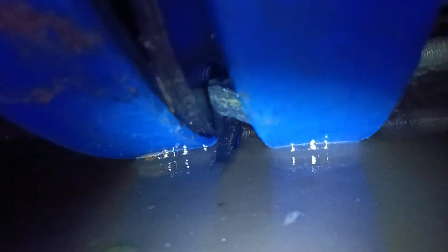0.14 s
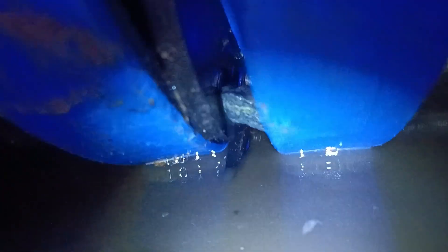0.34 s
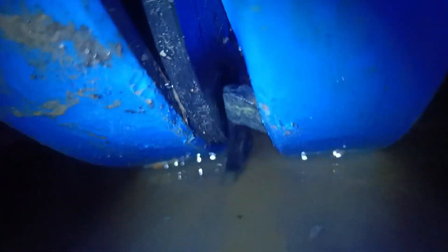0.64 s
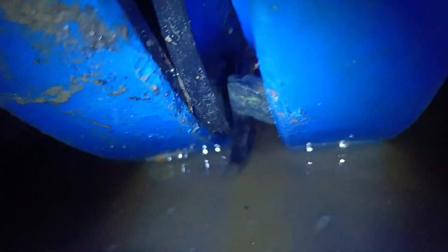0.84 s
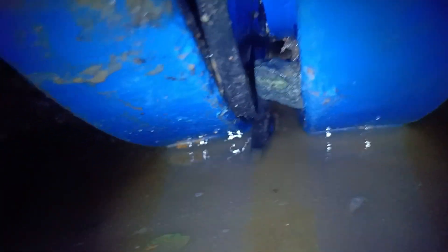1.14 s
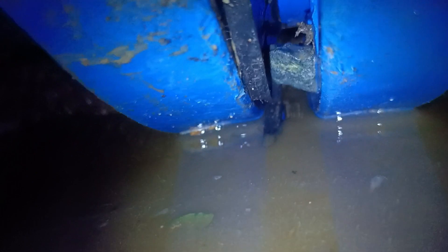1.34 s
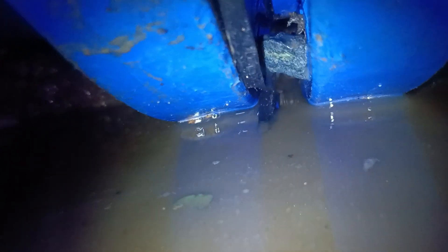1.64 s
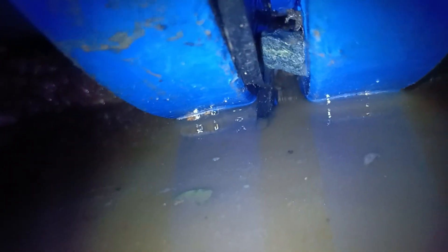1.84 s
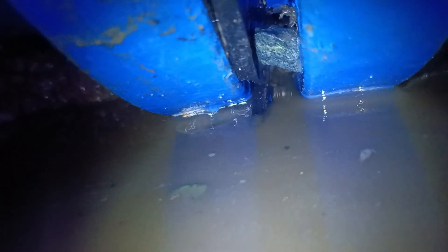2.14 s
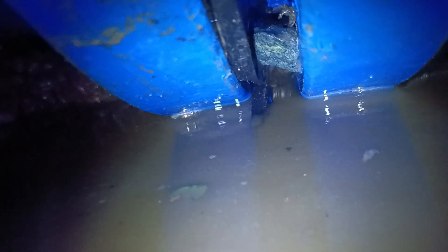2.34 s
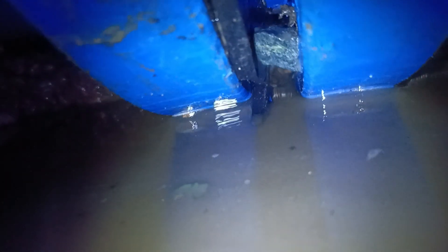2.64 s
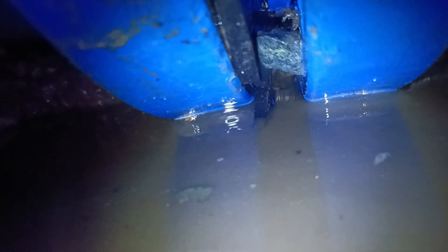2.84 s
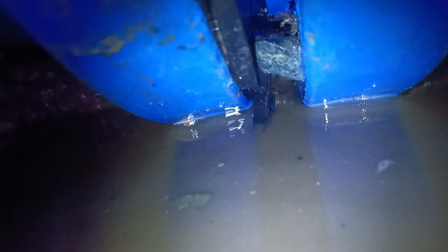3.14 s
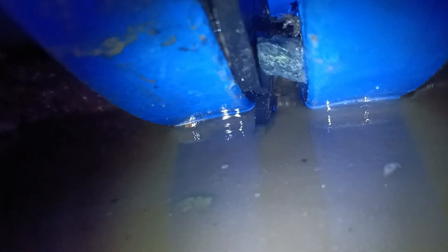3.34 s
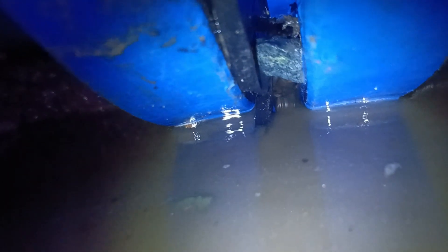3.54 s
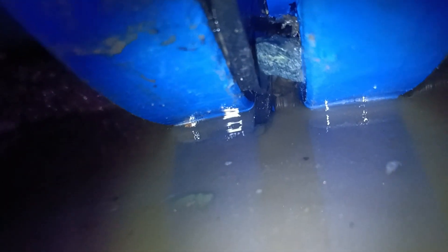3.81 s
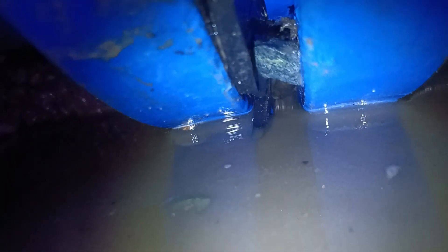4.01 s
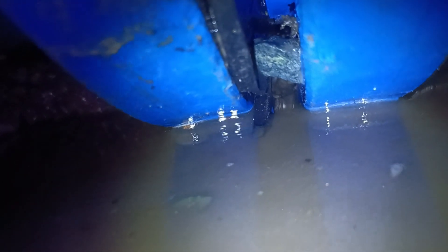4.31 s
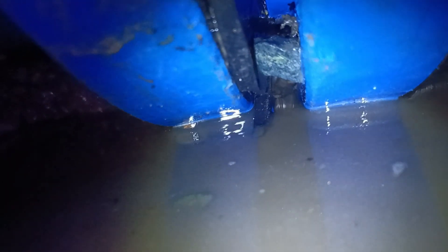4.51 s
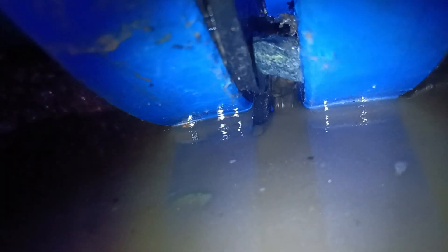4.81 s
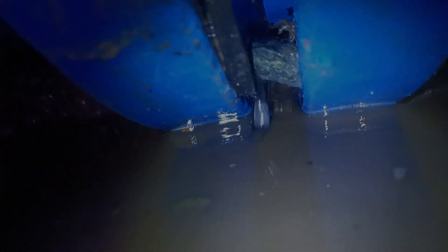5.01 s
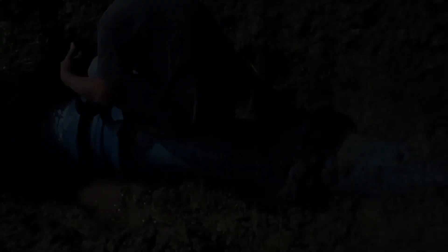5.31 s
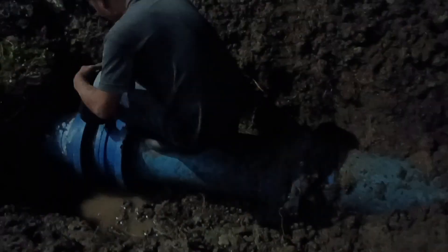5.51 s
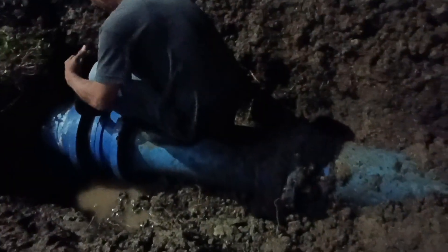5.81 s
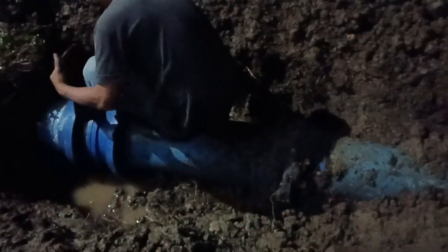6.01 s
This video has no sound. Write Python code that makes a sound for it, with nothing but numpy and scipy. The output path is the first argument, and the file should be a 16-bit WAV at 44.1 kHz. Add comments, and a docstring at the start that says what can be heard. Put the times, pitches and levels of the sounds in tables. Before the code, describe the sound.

Loud, wet sputtering fills the foreground: bubbles burst and snap in quick uneven clusters, coloured by a hollow pipe, with crisp spray on top and low glugs beneath. Brief gaps early on let the churning water show; later the bursts crowd together and gurgle more thickly. After five seconds everything stops dead. Then, much quieter and farther away, a soft dull water wash is heard outdoors with a thin, falling insect-like chirp.

```python
"""Air and water sputter from a leaking joint of a wide plastic pipe, just under a muddy puddle, very near.
Spurts of small bubbles, noise and spray are gated by a fluttering gap and filtered by the pipe's resonances.
Big bubbles pop through the same pipe; soft drips are damped sines; the flow is shaped noise with glugs.
After a cut to silence the trench is heard from farther away: a dull noise wash and one thin high chirp."""
import sys
import numpy as np
from scipy import signal
from scipy.fft import rfft, irfft, next_fast_len
from scipy.io import wavfile
from scipy.ndimage import uniform_filter1d, minimum_filter1d, map_coordinates

SR = 44100
rng = np.random.default_rng(int(sys.argv[2]) if len(sys.argv) > 2 else 0)


def output_pcm(signal):
    """Save a mono or channel-first signal as 16-bit PCM at the path in sys.argv[1].

    Samples are clipped to [-1, 1] before scaling.
    """
    pcm = np.clip(np.atleast_2d(signal).T, -1, 1) * 32767
    wavfile.write(sys.argv[1], SR, np.round(pcm).astype(np.int16))


def boost_factor(decibels):
    """Convert a level in decibels to a linear amplitude factor."""
    exponent = np.asarray(decibels, float) / 20
    return 10 ** exponent


N = 271656

# far wash spectrum: f/Hz, relative density/dB
FAR_WASH = [(30, -29.5), (60, -7), (150, -1.5), (360, -9), (1350, -13), (3000, -21), (4500, -39.5),
            (7100, -40), (7800, -35), (8500, -39), (15300, -55), (16000, -82)]
# chirp track: t/s, f/Hz, rms level/dB
CHIRP_TRACK = [(5.705, 11850, -63), (5.76, 11850, -62), (5.82, 11300, -65), (5.885, 10560, -78)]
# flow rumble spectrum, with a faint wash on top: f/Hz, relative density/dB
FLOW_RUMBLE = [(24, -56), (40, -20.5), (91, -0.5), (266, -2), (621, -21.5), (859, -20.5), (2710, -31),
               (4680, -59.5), (9180, -57.5), (15500, -69)]
# air pockets in the flow: t/s, level before decay/dB, starting f/Hz
AIR_POCKETS = [(0.336, -20, 159), (1.051, -19, 162), (2.11, -20.5, 161.5), (3.349, -14.5, 171),
               (3.631, -13.5, 232), (3.777, -16.5, 274), (4.157, -18, 107), (4.483, -15.5, 300),
               (4.552, -14, 148.5), (5.155, -14.5, 164.3)]
# soft single bubbles: t/s, level before decay/dB, starting f/Hz
SOFT_BUBBLES = [(0.8, -29, 1830), (1.242, -22, 700), (1.283, -25, 1110), (1.254, -35, 4200),
                (1.344, -30, 2900), (1.881, -22, 2490), (4.849, -21, 2480)]
# big bubbles: t/s, peak level/dB, starting f/Hz
BIG_BUBBLES = [(0.098, -2.5, 1790), (0.153, -5, 1240), (0.171, -9.5, 696), (0.186, 6, 2160),
               (0.276, -18.5, 9500), (0.282, -16.5, 447), (0.343, -7, 1800), (0.365, -6.5, 1960),
               (0.407, 0, 1690), (0.495, -1.5, 1630), (0.552, -4, 700), (0.566, -7.5, 660),
               (0.58, -2, 2380), (0.682, -6.5, 524), (0.71, -11.5, 2520), (0.896, -13, 1300),
               (0.957, -10, 646), (1.031, -2.5, 1790), (1.09, -6.5, 700), (1.104, -10, 463),
               (1.12, 4.5, 537), (1.281, -21, 1780), (1.372, -3.5, 780), (1.432, -7, 690),
               (1.433, -7, 2627), (1.464, -9.5, 2570), (1.496, -11.5, 660), (1.559, -8, 560),
               (1.583, -7.5, 471), (1.595, -5, 1810), (1.621, 0.5, 1600), (1.68, -6, 1900),
               (1.75, -6.5, 730), (1.823, -2, 2630), (1.998, -16.5, 1240), (2.066, -4.5, 3000),
               (2.089, -1, 1450), (2.179, -7.5, 2560), (2.207, -5, 2630), (2.407, -2, 1900),
               (2.449, -10.5, 517), (2.458, -7.5, 2380), (2.491, -8, 2830), (2.531, -6.5, 1810),
               (2.583, -5.5, 2860), (2.667, -12, 2500), (2.692, -7.5, 1640), (2.746, -11, 690),
               (2.852, -5.5, 2650), (2.857, -9.5, 716), (2.924, -5, 700), (2.924, -4, 2590),
               (2.974, -3, 684), (3.033, -4.5, 2584), (3.06, -9, 700), (3.073, -7, 720), (3.112, -7, 1790),
               (3.152, -13.5, 696), (3.163, -14, 704), (3.197, -3, 2920), (3.244, 1.5, 1900),
               (3.324, -10, 2412), (3.345, -5.5, 600), (3.351, -9.5, 2630), (3.406, -4.5, 643),
               (3.46, -12, 720), (3.526, -6, 1320), (3.632, -10.5, 2800), (3.642, -7.5, 660),
               (3.672, -5.5, 456), (3.731, -2.5, 480), (3.788, -2.5, 2720), (3.802, -2.5, 1600),
               (3.822, -16, 2630), (3.867, -17.5, 2610), (3.883, -9.5, 660), (3.904, -11, 2630),
               (3.956, -1, 1830), (4.028, 2, 705), (4.047, -5, 495), (4.106, -13, 9200), (4.125, -5, 2610),
               (4.208, -16, 657), (4.228, -3.5, 1740), (4.258, -12, 1300), (4.278, -3, 700),
               (4.305, -9.5, 664), (4.323, -9, 1840), (4.34, 0.5, 452), (4.363, -8, 1830),
               (4.375, 3.5, 1900), (4.413, -12.5, 690), (4.436, -10.5, 690), (4.452, -6, 510),
               (4.489, -10, 2900), (4.57, -8.5, 704), (4.594, -10.5, 474), (4.613, -7.5, 484),
               (4.626, -4, 1950), (4.658, -3.5, 1660), (4.679, -12.5, 1810), (4.759, -1.5, 450),
               (4.771, -9, 730), (4.778, -4, 2050), (4.998, -7, 525.5), (5.022, -10, 746),
               (5.051, -3.5, 1540), (5.064, -4, 1809), (5.122, -6.5, 467), (5.146, 0, 1914)]
# spurts: t/s, length/s, rattle level/dB, spray level/dB (levels at the height of the swell)
SPURT_TIMES = [(0, 0.03, -14.5, -43.5), (0.052, 0.056, -23, -32.5), (0.137, 0.064, -19, -31.5),
               (0.25, 0.076, -21, -24), (0.319, 0.063, -11, -30), (0.403, 0.12, -29, -46),
               (0.497, 0.037, -16.5, -41), (0.556, 0.032, -18, -32.5), (0.641, 0.097, -20, -24),
               (0.94, 0.084, -23, -30), (1.026, 0.01, -16.5, -40.5), (1.072, 0.095, -19, -30),
               (1.174, 0.03, -25.5, -35.5), (1.374, 0.064, -21, -35.5), (1.428, 0.063, -20.5, -34),
               (1.528, 0.019, -30.5, -41), (1.56, 0.041, -26.5, -36), (1.625, 0.07, -20.5, -33.5),
               (1.737, 0.1, -19.5, -29.5), (2.041, 0.036, -27.5, -31.5), (2.09, 0.057, -28, -31.5),
               (2.155, 0.063, -16.5, -31.5), (2.238, 0.02, -32, -45.5), (2.417, 0.088, -20.5, -28),
               (2.525, 0.076, -21.5, -36.5), (2.623, 0.093, -22, -38), (2.728, 0.09, -26, -30),
               (2.793, 0.09, -15, -30.5), (2.918, 0.022, -15, -43), (2.952, 0.15, -19.5, -31),
               (3.076, 0.06, -19.5, -47.5), (3.152, 0.015, -26, -31), (3.197, 0.0066, -19, -34),
               (3.255, 0.019, -19.5, -44), (3.295, 0.077, -15, -27), (3.432, 0.066, -19.5, -30),
               (3.504, 0.081, -19.5, -33), (3.598, 0.049, -16, -30.5), (3.677, 0.0067, -20, -26),
               (3.696, 0.11, -22, -29), (3.869, 0.04, -21.5, -39.5), (3.95, 0.057, -18, -33.5),
               (4.034, 0.1, -23, -30.5), (4.2, 0.043, -18, -29.5), (4.285, 0.094, -15, -32),
               (4.432, 0.074, -23.5, -31.5), (4.488, 0.067, -17, -36), (4.566, 0.077, -19.5, -32),
               (4.698, 0.089, -15.5, -28.5), (4.972, 0.12, -20, -33), (5.107, 0.036, -28.5, -34),
               (5.147, 0.084, -26.5, -39)]
# broad colour of the joint: f/Hz, relative level/dB
JOINT_COLOUR = [(150, -32), (330, -9), (450, -10.5), (800, -6.5), (1300, -15), (2000, -5.5), (3050, -11),
                (3400, -34.5), (5000, -35), (7000, -39), (9000, -25.5), (11000, -35), (15400, -31.5),
                (16000, -88.5)]
# resonances (+) and nulls (-) of pipe and gap: f/Hz, width/Hz, gain/dB
PIPE_MODES = [(473, 110, 6.5), (700, 71, 9.5), (817, 130, -3.5), (1030, 72, 10.5), (1117, 111, -21),
              (1240, 130, 15), (1450, 46, 8), (876, 15, -15), (1704, 19, -22), (1790, 61, 8),
              (2088, 45, -22), (2373, 46, 2.5), (2630, 131, 9.5), (2893, 36, 7), (3263, 560, 8.5),
              (3977, 220, 15), (4828, 86, 12), (5450, 49, -18), (5570, 1000, 10), (6360, 130, -8.5),
              (6540, 110, 5), (8400, 110, 3.5), (9380, 550, 10), (9890, 200, -5.5), (10690, 1000, 7),
              (12850, 220, 9.5)]

CUT_S, RETURN_S = 5.189, 5.703

# spurt envelope; spray fades more slowly and starts to fade before the bubbling does
RISE_DB_PER_MS, FALL_DB_PER_MS, SWELL_DB = 1.94, 3.5, 4.5
SPRAY_EARLY_MS, SPRAY_FALL_DB_PER_MS = 16, 1.25
# gurgle level: leans on rattle and spray, grows as the puddle closes over the gap
GURGLE_DB, MID_RATTLE_DB, MID_SPRAY_DB = -23.5, -19, -37.5
GURGLE_PER_RATTLE, GURGLE_PER_SPRAY, GURGLE_GROWTH_DB_PER_S = 0.14, 0.36, 0.86
# trickle leading into and trailing each spurt, relative to its smoothed power
DRIBBLE_DB, DRIBBLE_S = -19.5, 0.026

# flow: fast and slow level swings; rumble follows the gurgle around it
LUMPS_DB, HEAVE_DB = 1.8, 0.8
CHURN_EXPONENT, CHURN_WINDOW_S = 0.2, 0.036

DRIP_CYCLES, DRIP_RISE, DRIP_ATTACK_S = 4, 0.012, 0.0008
POP_LIFE_S, POP_ATTACK_S = 0.0017, 0.00016
POP_SNAP, POP_SNAP_LIFE_S = 0.06, 0.0043
# one short push of the bursting film, rings every mode
POP_SLAP, SLAP_S = 0.53, 0.00009
# spit at each pop: level at pop peaks of 0 dB and above, dB change per pop dB below
POP_SPIT_DB, POP_SPIT_SLOPE = 3, 0.61


def along(points, hz):
    """Interpolates (f/Hz, value) points on a log frequency axis."""
    f, v = np.transpose(points)
    return np.interp(np.log(hz + 1), np.log(f + 1), v)


def curves(rows):
    """One value per sample for each column after the time."""
    s, *cols = np.transpose(rows)
    return [np.interp(np.arange(N) / SR, s, c) for c in cols]


def unit(x):
    """Scales to rms 1."""
    return x / np.sqrt(np.mean(x ** 2) + 1e-20)


def wobble(rate_hz):
    """Smooth random curve, rate_hz knots a second."""
    knots = rng.standard_normal(int(N * rate_hz / SR) + 4)
    return map_coordinates(knots, [np.arange(N) * rate_hz / SR])


def filtered(x, gain):
    """Applies a zero-phase gain of frequency."""
    m = next_fast_len(N + 8192)
    return irfft(rfft(x, m) * gain(np.fft.rfftfreq(m, 1 / SR)), m)[:N]


def band(x, lo_hz, hi_hz):
    """Soft-edged band of x at rms 1."""
    def gain(hz):
        return 1 / (1 + (lo_hz / (hz + 1)) ** 8) / (1 + (hz / hi_hz) ** 8)
    return unit(filtered(x, gain))


def bubble(hz, cycles, t, rise=0.034):
    """A bubble's breathing: damped sine rising a little in pitch; cycles = decay time in periods."""
    life = hz * t / cycles
    return np.sin(2 * np.pi * hz * t * (1 + rise * life)) * np.exp(-life)


def swarm(count, hz, spread, cycles, size_db):
    """Small bubbles at random times, pitches (log-normal about hz) and capped exponential sizes; rms 1."""
    u, g = rng.random((count, 2)), rng.standard_normal((count, 1))
    k = np.arange(500)
    size = boost_factor(size_db * np.minimum(-np.log(u[:, :1]), 3))
    pitch_hz = np.minimum(hz * np.exp(spread * g), SR / 3)
    rings = bubble(pitch_hz, cycles, k / SR) * size
    at = (u[:, 1:] * N).astype(int) + k
    return unit(np.bincount(at.ravel(), rings.ravel(), N + len(k))[:N])


def patches(x, depth_db):
    """Shifting colour: a smooth random gain over time and frequency."""
    z = signal.stft(x, nperseg=512)[2]
    field = uniform_filter1d(rng.standard_normal(z.shape), size=12, axis=0)
    field = uniform_filter1d(field, size=5, axis=1)
    return signal.istft(z * boost_factor(depth_db * unit(field)), nperseg=512)[1][:N]


def pipe_response(size=4096):
    """Minimum-phase impulse response of joint and pipe, from the cepstrum of its log gain."""
    hz = np.fft.rfftfreq(2 * size, 1 / SR)
    db = along(JOINT_COLOUR, hz)
    for centre_hz, width_hz, gain_db in PIPE_MODES:
        db = db + gain_db / (1 + (2 * (hz - centre_hz) / width_hz) ** 2)
    cepstrum = irfft(np.log(boost_factor(db)))
    cepstrum[1:size] *= 2
    cepstrum[size + 1:] = 0
    return irfft(np.exp(rfft(cepstrum)))[:size]


def spurt_gains():
    """Amplitudes of rattle, gurgle and spray: each spurt opens fast, swells and chokes off."""
    power, ms = np.zeros((3, N)), np.arange(N) / SR * 1000
    fall = np.array([[FALL_DB_PER_MS], [FALL_DB_PER_MS], [SPRAY_FALL_DB_PER_MS]])
    for s, length_s, rattle_db, spray_db in SPURT_TIMES:
        gurgle_db = GURGLE_DB + GURGLE_GROWTH_DB_PER_S * s
        gurgle_db += GURGLE_PER_RATTLE * (rattle_db - MID_RATTLE_DB)
        gurgle_db += GURGLE_PER_SPRAY * (spray_db - MID_SPRAY_DB)
        # at most a quarter of the spurt
        early_ms = np.array([[0], [0], [min(SPRAY_EARLY_MS, length_s * 250)]])
        near = slice(max(0, round((s - 0.05) * SR)), round((s + length_s + 0.1) * SR))
        since_ms, span_ms = ms[near] - s * 1000, length_s * 1000
        shape_db = SWELL_DB * (np.sin(np.pi * np.clip(since_ms / span_ms, 0, 1)) - 1)
        shape_db = shape_db - RISE_DB_PER_MS * np.maximum(-since_ms, 0)
        shape_db = shape_db - fall * np.maximum(since_ms - span_ms + early_ms, 0)
        power[:, near] += boost_factor(shape_db + np.array([[rattle_db], [gurgle_db], [spray_db]])) ** 2
    dribble = power
    for _ in range(2):
        dribble = uniform_filter1d(dribble, size=round(DRIBBLE_S * SR))
    return np.sqrt(power + boost_factor(DRIBBLE_DB) ** 2 * np.abs(dribble))


def spits(count, life_s, size_db, steady):
    """The gap passes air in sudden decaying spits, one at each pop; rms over 3000 samples held even."""
    u = rng.random((count, 2))
    size = boost_factor(size_db * np.minimum(-np.log(u[:, 1]), 3))
    kicks = np.bincount((u[:, 0] * N).astype(int), size, N)
    s, db, _ = np.transpose(BIG_BUBBLES)
    kicks[(s * SR).astype(int)] += boost_factor(POP_SPIT_DB + POP_SPIT_SLOPE * np.minimum(db, 0))
    decaying = signal.lfilter([1], [1, -np.exp(-1 / (life_s * SR))], kicks)
    saw = steady + unit(decaying)
    return saw / np.sqrt(uniform_filter1d(saw ** 2, size=3000))


def trench():
    """Distant wash of the leak (shaped noise) and a thin, unsteady falling chirp (a jittered sine)."""
    wash = filtered(rng.standard_normal(N), lambda hz: boost_factor(along(FAR_WASH, hz)))
    wash = unit(wash * boost_factor(0.61 * wobble(20)))
    hz, db = curves(CHIRP_TRACK)
    t = np.arange(N) / SR
    phase = 2 * np.pi * np.cumsum(hz + 45 * wobble(90)) / SR
    chirp = np.sqrt(2) * boost_factor(db + 2.5 * wobble(70)) * np.sin(phase)
    chirp = chirp * (t < CHIRP_TRACK[-1][0])
    return boost_factor(-34.5) * wash + chirp


def flow():
    """Water churning in the pipe: lumpy low noise with a hollow note, and air pockets that glug."""
    def rumble_gain(hz):
        hollow = 1 + 1 / (1 + ((hz - 92) / 8) ** 2)
        return boost_factor(along(FLOW_RUMBLE, hz)) * hollow
    rumble = filtered(rng.standard_normal(N), rumble_gain)
    gurgle = uniform_filter1d(spurt_gains()[1], size=round(CHURN_WINDOW_S * SR))
    churn = (0.087 + unit(gurgle)) ** CHURN_EXPONENT
    lumps = boost_factor(LUMPS_DB * wobble(21) + HEAVE_DB * wobble(2.6))
    t = np.arange(SR // 8) / SR
    out = np.pad(boost_factor(-28.5) * unit(rumble * lumps * churn), (0, len(t)))
    for s, db, hz in AIR_POCKETS:
        glug = bubble(hz, 6.6, t) * (1 - np.exp(-t / 0.00088))
        out[round(s * SR):][:len(t)] += boost_factor(db) * glug
    return out[:N]


def drips():
    """Lone bubbles: damped sines that start softly and glide slightly upward."""
    out, t = np.zeros(N), np.arange(SR // 10) / SR
    attack = 1 - np.exp(-t / DRIP_ATTACK_S)
    for s, db, hz in SOFT_BUBBLES:
        drip = bubble(hz, DRIP_CYCLES, t, DRIP_RISE) * attack
        out[round(s * SR):][:len(t)] += boost_factor(db) * drip
    return out


def pops(pipe):
    """Each big bubble snaps off with a noise click and a push, rings briefly and excites the pipe."""
    out, t = np.zeros(N + SR), np.arange(1024) / SR
    snaps = rng.standard_normal((len(BIG_BUBBLES), len(t)))
    slap = POP_SLAP * np.exp(-(t / SLAP_S - 2) ** 2)
    for (s, db, hz), snap in zip(BIG_BUBBLES, snaps):
        source = bubble(hz, hz * POP_LIFE_S, t) * (1 - np.exp(-t / POP_ATTACK_S))
        source += POP_SNAP * snap * np.exp(-t / POP_SNAP_LIFE_S) + slap
        ring = signal.fftconvolve(source, pipe)
        out[round(s * SR):][:len(ring)] += boost_factor(db) * ring / np.abs(ring).max()
    return out[:N]


def sputter(pipe):
    """Bubble swarms and spray, spitting together as the gap flutters, heard through the pipe."""
    def ring(x):
        return signal.fftconvolve(x, pipe)[:N]

    def hiss(db):
        return boost_factor(db) * rng.standard_normal(N)

    flutter = spits(count=380, life_s=0.0028, size_db=-3.0, steady=1.0)
    gurgle = swarm(count=1800, hz=619, spread=0.32, cycles=1.66, size_db=2.5) + hiss(-4)
    gurgle = patches(gurgle, depth_db=1.0)
    rattle = swarm(count=3600, hz=2171, spread=0.35, cycles=4.53, size_db=3.0) + hiss(-4.5)
    rattle = patches(rattle, depth_db=4.0)
    spray = swarm(count=6000, hz=8530, spread=0.5, cycles=14, size_db=2.0) + hiss(1.0)
    spray = patches(spray, depth_db=4.5)
    spray = spray * spits(count=320, life_s=0.0018, size_db=5.0, steady=1.3)
    # stray small bubbles that never stop
    seep = ring(swarm(count=500, hz=2160, spread=1.0, cycles=2.8, size_db=4.5))
    # lone droplets in a thin mist, treble raised by differencing
    droplets = swarm(count=150, hz=8100, spread=0.4, cycles=12, size_db=5.0) + hiss(-6)
    ticks = ring(np.diff(droplets, prepend=0))
    out = boost_factor(-44.5) * unit(seep) + boost_factor(-62) * unit(ticks)
    # source, low/Hz, high/Hz, own unsteadiness/dB, flutter exponent
    layers = [(rattle, 1000, 3400, 1.4, 0.7),
              (gurgle, 300, 1000, 1.4, 0.6),
              (spray, 3400, 16500, 2.5, 0.3)]
    for (source, lo_hz, hi_hz, own_db, follow), gain in zip(layers, spurt_gains()):
        unsteady = source * boost_factor(own_db * wobble(45))
        source = band(unsteady, lo_hz, hi_hz) * flutter ** follow
        out += ring(gain * source) / np.std(ring(source))
    return out


def scene():
    """The near leak, a cut to silence, then the far view."""
    t, pipe = np.arange(N) / SR, pipe_response()
    near = trench_free = flow() + drips() + pops(pipe) + sputter(pipe)
    near = near * np.clip((CUT_S - t) / 0.0039, 0, 1)
    far = trench() * np.clip((t - RETURN_S) / 0.0008, 0, 1)
    return (near + far)[None]


def roll_off(x):
    """The treble ends steeply here."""
    return signal.sosfilt(signal.butter(12, 16470, fs=SR, output="sos"), x)


def record(dry):
    """A fast limiter holds peaks to 0.93 of full scale."""
    need = np.minimum(1, 0.93 / (np.abs(dry) + 1e-9))
    gain = uniform_filter1d(minimum_filter1d(need, size=120), size=60)
    return roll_off(dry * gain)


dry = scene()
out = record(dry)
output_pcm(out)
```